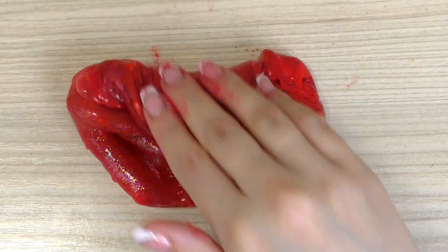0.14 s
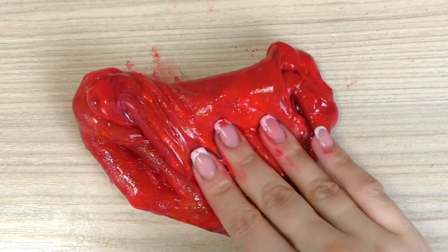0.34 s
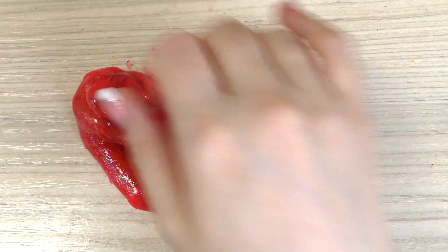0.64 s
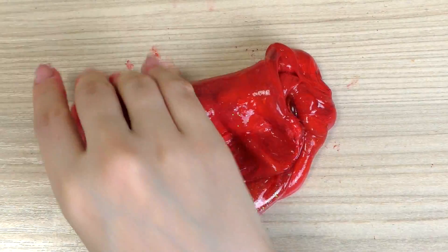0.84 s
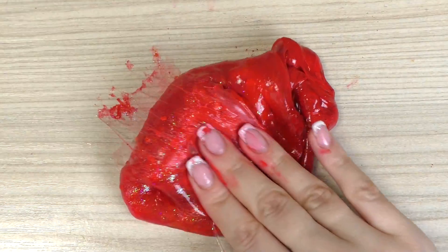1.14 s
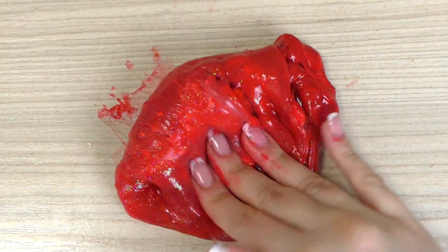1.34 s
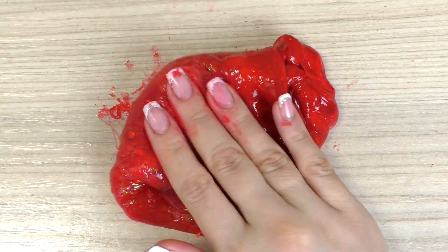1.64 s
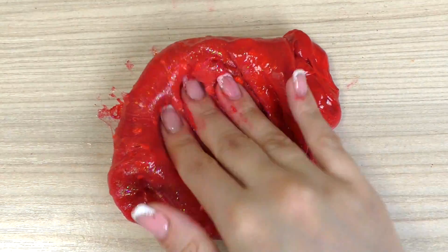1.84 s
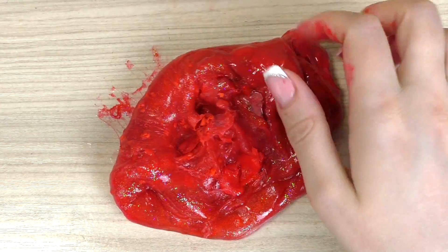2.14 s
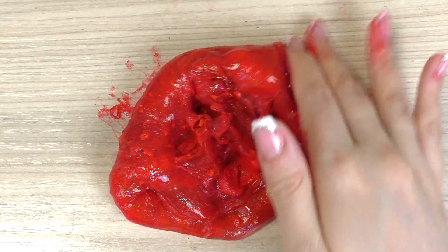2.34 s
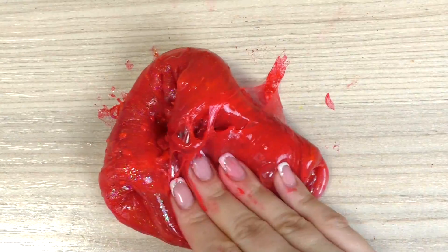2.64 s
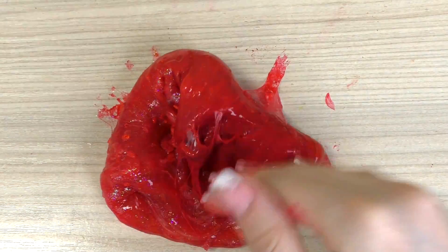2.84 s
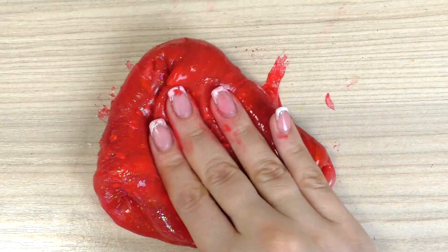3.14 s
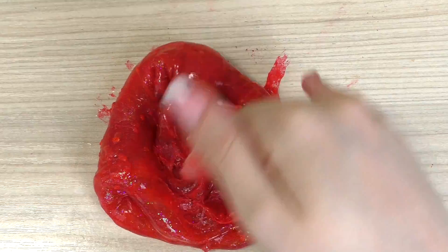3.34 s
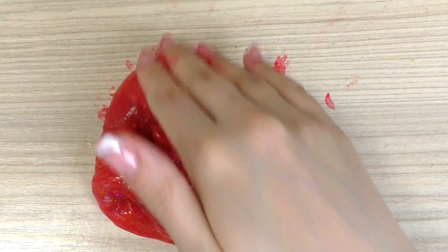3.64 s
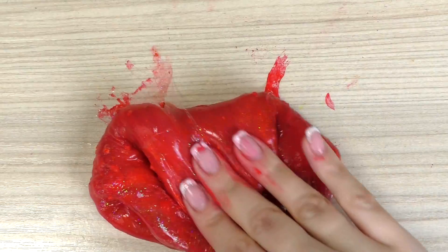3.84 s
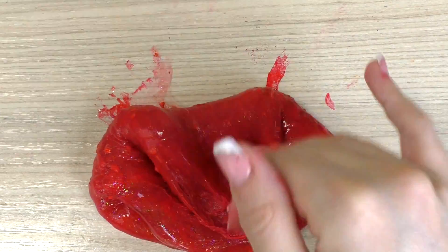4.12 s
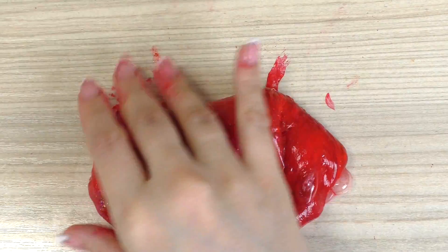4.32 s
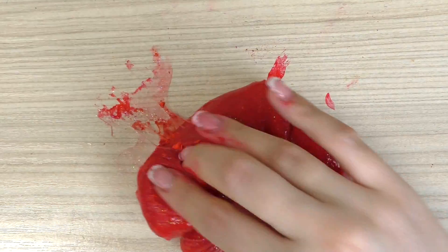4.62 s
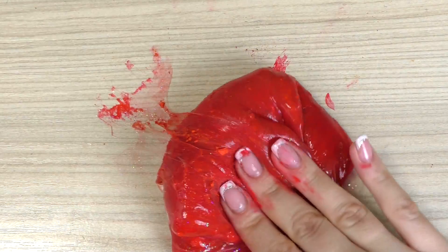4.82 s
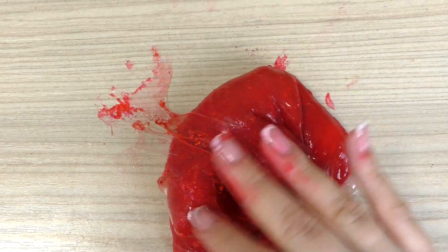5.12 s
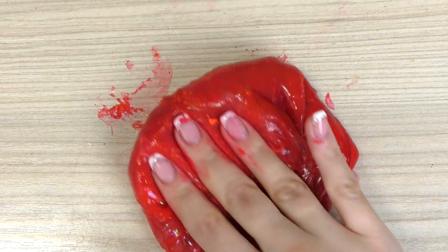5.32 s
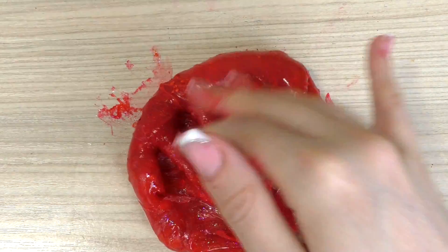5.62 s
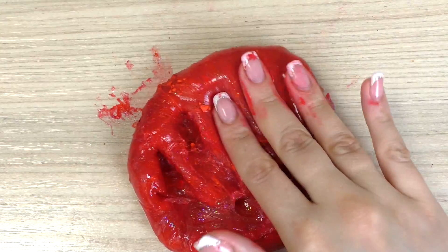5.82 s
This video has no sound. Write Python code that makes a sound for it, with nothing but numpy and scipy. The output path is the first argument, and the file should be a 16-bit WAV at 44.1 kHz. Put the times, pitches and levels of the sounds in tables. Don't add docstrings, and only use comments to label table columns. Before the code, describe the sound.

Close-up slime kneading: sparse crisp bubble snaps, moist crackling peels and soft dull thuds in a small hard room.

```python
import sys
import numpy as np
from scipy import signal
from scipy.fft import rfft, irfft
from scipy.io import wavfile
from scipy.ndimage import uniform_filter1d

SR = 44100
rng = np.random.default_rng(int(sys.argv[2]) if len(sys.argv) > 2 else 0)


def makeup_ratio(level_db):
    decades = np.asarray(level_db, float) / 20
    return 10 ** decades


def wrap_up_sound(samples):
    columns = np.atleast_2d(samples).T
    tamed = np.clip(columns, -1, 1)
    steps = np.round(tamed * 32767).astype(np.int16)
    wavfile.write(sys.argv[1], SR, steps)


N = 263277
LEFT_RIGHT = np.array([[1], [-1]])


def rms_one(x):
    return x / np.sqrt(np.mean(x ** 2) + 1e-30)


def at_hz(points, hz, column=1):
    points = np.array(points)
    return np.interp(np.log(hz), np.log(points[:, 0]), points[:, column])


def band(x, low_hz, high_hz):
    sos = signal.butter(2, [low_hz, min(high_hz, .45 * SR)], "band", fs=SR, output="sos")
    return signal.sosfilt(sos, x)


def smooth_noise(shape, size):
    return rms_one(uniform_filter1d(rng.standard_normal(shape), size=size))


def ring(clicks, hz, t60_s):
    r = makeup_ratio(-60 / (t60_s * SR))
    w = 2 * np.pi * hz / SR
    return signal.lfilter([0, np.sin(w)], [1, -2 * r * np.cos(w), r * r], clicks + 1e-18)


def add(out, crest_s, peak_db, hz, rise_s, phase):
    t = np.arange(int(5 * rise_s * SR) + 2) / SR
    start = max(round((crest_s - rise_s) * SR), 0)
    swell = (t / rise_s * np.exp(1 - t / rise_s)) ** 3
    wave = makeup_ratio(peak_db) * swell * np.cos(2 * np.pi * hz * (t - rise_s) + phase)
    out[start:start + len(t)] += wave[:N - start]


# peak t/s, level/dB, f/Hz, Q
AIR_POCKETS = [(.1214, -48.5, 1300, 2.9), (.4578, -40, 1610, 5), (.2596, -37, 1370, 0.86),
               (.2658, -43, 1960, 3.3), (.385, -39, 1410, 6.8), (.389, -25.5, 1410, 10),
               (.441, -25, 1500, 6.5), (.4477, -9, 1600, 5), (.4515, -35, 1650, 2.1),
               (.974, -50, 1193, 4.8), (1.0579, -47.5, 2520, 7.8), (1.1572, -47, 1580, 5.1),
               (1.1738, -33, 1770, 2.7), (1.2511, -49, 1577, 3.3), (1.299, -51, 2180, 2.4),
               (1.3262, -33, 1712, 3), (1.7232, -50.5, 1484, 2.9), (2.0674, -48, 2446, 7.6),
               (2.356, -24.5, 2114, 1.45), (2.6685, -43, 2330, 1.6), (2.7468, -34, 1630, 4.3),
               (2.909, -56, 1390, 1.25), (3.155, -34.5, 2030, 0.8), (3.4031, -46, 1270, 2.9),
               (3.993, -42.5, 1950, 2), (4.471, -35.5, 2200, 5.4), (4.472, -40, 1410, 9.1),
               (4.9216, -37.5, 2270, 1.3), (5.1094, -45, 1815, 2.4), (5.6639, -42, 1373, 2),
               (.259, -46.5, 5330, 2.3), (.371, -44, 3800, 2.7), (.446, -22.5, 2840, 3.3),
                 (1.0581, -28.5, 4730, 1.4), (1.131, -39.5, 3860, 2), (1.1733, -32, 3600, 2.9),
                 (1.1725, -36, 7065, 8), (1.299, -38, 3760, 2.1), (1.3256, -10.5, 3950, 1.84),
                 (1.3256, -12, 6530, 4.9), (.4475, -30, 1094, 1.4), (1.5137, -44, 3440, 3),
                 (1.7463, -52, 3360, 3.7), (1.8422, -48.5, 1520, 2.4), (2.3585, -25.5, 4830, 1.45),
                 (2.542, -39, 6560, 1.3), (2.903, -39, 4400, 2.4), (2.912, -33.5, 5460, 1.9),
                 (3.155, -22.5, 4530, 2.2), (3.155, -11.5, 6910, 2.67), (3.399, -37, 6400, 3.5),
                 (4.0304, -45.5, 4470, 1.7), (4.8, -51, 3470, 2.8), (5.1, -31.5, 4300, 1.8),
                 (5.1094, -25, 3940, 2.03), (5.4599, -44, 6250, 4.6), (5.6468, -38, 5740, 1.8),
                 (5.66, -35, 4260, 2.4), (5.9684, -36, 5240, 1.2)]


def pockets():
    return AIR_POCKETS


# peak t/s, level/dB, f/Hz
FILMS = [(1.0046, -37, 11000), (1.1729, -27, 10440), (1.325, -20, 9810), (1.3257, -13, 14200),
         (1.3287, -32, 14000), (1.4208, -36.5, 12000), (1.6086, -42.5, 12500), (2.0215, -35, 12800),
         (2.0646, -32, 13000), (2.354, -34, 12200), (2.446, -39, 10200), (2.6881, -42, 10620),
         (2.7465, -16.5, 10600), (2.751, -34, 10060), (2.9012, -33, 10300), (3.1512, -28, 8000),
         (3.155, -30.5, 12500), (3.153, -30, 15400), (3.294, -40.5, 12640), (3.3992, -15.5, 10760),
         (4.1639, -29, 10060), (5.105, -34, 11070), (5.6469, -26, 13300), (5.66, -20, 10170),
         (5.6886, -43, 11750), (5.706, -33, 10800), (5.863, -29, 12660), (5.9684, -35, 12010)]


def films():
    film_q = 4.2
    return [(*film, film_q) for film in FILMS]


# middle slip t/s, level/dB, f/Hz, lean/dB (+ late slip stronger, - early)
TEARS = [(0.1484, -27, 4680, 5), (0.1501, -24, 8640, -1), (0.27, -40, 11300, -5), (0.2865, -37, 12700, -6),
         (.958, -31.5, 12800, -6), (1.011, -34, 7260, 3), (1.0086, -28, 9900, -11),
         (1.0596, -24.5, 8670, -11.5), (1.0615, -40, 6520, -1), (2.0233, -34.5, 6340, 0),
         (2.06, -30, 4040, 1), (2.066, -27.5, 3880, 1), (2.3566, -25, 3840, -6), (2.751, -31, 6930, -7),
         (2.8866, -36.5, 12000, 5), (2.9143, -31.5, 11340, -12), (3.8069, -46, 6250, -7),
         (3.8085, -35.5, 9800, -13), (4.1577, -39, 11700, -4.5), (4.4703, -34.5, 3500, 0.5),
         (4.594, -38, 10200, 10), (4.917, -44.5, 4460, 10), (4.9184, -31.5, 11300, 1),
         (5.1096, -23.5, 10750, -1.7), (5.4598, -25.5, 12000, 11), (5.663, -25, 4400, 0)]


def tears():
    gap_s, loss_db, detune, tear_q = .0021, 11.5, 0.028, 3
    slips = []
    for s, db, hz, lean_db in TEARS:
        for side in (-1, 0, 1):
            late, off = rng.uniform(-1, 1, 2)
            slip_s = s + side * gap_s * (1 + 0.28 * late)
            slip_db = db - abs(side) * loss_db + side * lean_db
            slips.append((slip_s, slip_db, hz * (1 + abs(side) * detune * off), tear_q))
    return slips


# peak t/s, level/dB
THREADS = [(.1229, -45), (.2394, -47), (.3222, -48), (0.406, -40), (0.582, -38), (1.2453, -42),
           (1.5007, -49), (1.5424, -39), (2.142, -46.5), (2.392, -48), (2.453, -42), (2.541, -36.5),
           (2.987, -39), (3.385, -36), (3.431, -39), (3.745, -48), (3.792, -47), (3.8386, -37),
           (2.657, -50), (2.635, -60), (3.93, -52.5), (4.0955, -46.5), (2.471, -53), (4.528, -55),
           (4.5517, -46), (4.657, -48), (4.7207, -46), (4.76, -45), (5.0941, -52), (5.419, -50.5)]


def threads():
    thread_hz, detune, thread_q = 10500, .08, 3.6
    offs = rng.uniform(-2.8, 1, len(THREADS))
    return [(s, db, thread_hz * (1 + detune * off), thread_q) for (s, db), off in zip(THREADS, offs)]


# peak t/s, level/dB, f/Hz, Q
MORE_BURSTS = [(.395, -45, 1360, 9.2), (.419, -38.5, 1420, 6.4), (.581, -40, 1650, 5), (1.795, -52, 2900, 3.3),
               (2.037, -40.5, 4000, 2.5), (2.075, -40, 3820, 8.2), (2.086, -45.5, 3700, 4), (2.205, -55, 9300, 4),
               (2.508, -49, 8800, 4), (2.571, -44, 11570, 4.1), (2.6688, -31, 9850, 7.9),
               (2.678, -38, 13500, 3.3), (4.186, -47, 10850, 5), (4.4702, -41, 9000, 1.1), (4.488, -46, 2040, 5),
               (4.498, -46, 2300, 3.4), (4.513, -48, 2800, 1.8), (4.528, -52, 2150, 5), (4.607, -40, 9400, 6),
               (4.619, -44, 4560, 3), (6.3, -45, 1700, 3.7), (4.813, -48, 7560, 3), (4.904, -55.5, 3704, 2),
               (4.951, -50.5, 3500, 4), (6.7, -49, 4700, 7.7), (5.681, -35.5, 4040, 4.5), (5.728, -55, 4600, 5)]


def more_bursts():
    return list(MORE_BURSTS)


def pops():
    air = np.zeros(N)
    for s, peak_db, hz, q in pockets() + films() + tears() + threads() + more_bursts():
        phase = rng.uniform(-.7, .7)
        add(air, s, peak_db - .4, hz, 0.45 * q / hz, phase)
        add(air, s, peak_db - 17.5, hz, 0.44 / hz, phase)
    return signal.sosfilt(signal.butter(3, 950, "high", fs=SR, output="sos"), air)


def crackle(level, per_s, low_hz, high_hz, cycles, spread_db):
    clumps = makeup_ratio(2.5 * smooth_noise(N, 250))
    sizes = clumps * makeup_ratio(spread_db * np.minimum(rng.exponential(1, N), 3)) * rng.choice([-1, 1], N)
    snaps = sizes * (rng.random(N) < per_s / SR)
    dealt = rng.integers(0, 14, N)
    grains = np.zeros(N)
    for k, hz in enumerate(np.geomspace(low_hz, high_hz, 14)):
        grains += ring(snaps * (dealt == k), hz, cycles / hz)
    return level * rms_one(band(grains, 1.15 * low_hz, 1.1 * high_hz))


# crest t/s, length/s, fine crackle level/dB, coarse squelch level/dB
PULLS = [(.123, 0.09, -72, -63), (.238, 0.023, -65, -70), (.615, 0.12, -61.5, -57),
         (.976, 0.045, -71, -61.5), (1.006, 0.059, -55, -60.5), (1.51, 0.11, -62.5, -64),
         (1.79, 0.13, -86.5, -68.5), (2.012, 0.075, -67, -62), (2.473, 0.088, -67.5, -63),
         (2.922, 0.064, -58.5, -52.5), (3.396, 0.12, -64.5, -61.5), (3.425, 0.082, -58, -55),
         (3.985, 0.18, -92, -76), (4.174, 0.089, -62.5, -60.5), (4.57, 0.096, -72, -77),
         (4.602, 0.044, -56, -65), (4.662, 0.033, -60.5, -66), (5.06, 0.48, -75.5, -68),
         (5.12, 0.084, -55.5, -53), (5.965, 0.079, -74, -66)]
# crest t/s, length/s, fine crackle level/dB, coarse squelch level/dB
SETTLES = [(.15, 0.083, -67, -62), (.29, 0.22, -73, -69), (.415, 0.2, -76, -63), (1.06, 0.055, -72, -74),
           (1.136, 0.17, -81, -65), (1.265, 0.41, -70.5, -63.5), (2.043, .17, -65, -63),
           (2.368, 0.13, -71, -56.5), (2.52, 0.2, -68, -61.5), (2.69, 0.54, -70.5, -67.5),
           (2.748, 0.042, -51, -53.5), (3.765, 0.39, -71.5, -71.5), (3.81, 0.14, -77, -72),
           (4.482, 0.088, -74.5, -57.5), (4.655, 0.33, -71, -73.5), (4.81, 0.26, -82, -67),
           (5.63, 0.17, -67.5, -65.5), (5.67, 0.096, -60, -63.5)]


def peeling():
    t = np.arange(N) / SR
    fine, coarse = np.zeros((2, N))
    for moves, rise in (PULLS, 0.54), (SETTLES, 0.11):
        for crest_s, length_s, fine_db, coarse_db in moves:
            knots_s = [-rise * length_s, 0, (1 - rise) * length_s]
            swell = np.sin(np.interp(t - crest_s, knots_s, [0, np.pi / 2, np.pi])) ** 2
            fine += makeup_ratio(fine_db + 2.5) * swell
            coarse += makeup_ratio(coarse_db - 1.5) * swell
    top = crackle(fine, 9000, 6500, 15500, cycles=8, spread_db=3)
    middle = crackle(coarse, 4000, 1150, 6500, cycles=8, spread_db=3.3)
    rumble = crackle(coarse * makeup_ratio(-7.0), 700, 110, 570, cycles=4.5, spread_db=0.5)
    return top + middle + rumble


# start t/s, length/s, level/dB rms, first f/Hz, last f/Hz
SQUEEZES = [
    (1.245, 0.053, -63.5, 1250, 1140),
    (2.01, .09, -60.5, 4800, 3596),
    (2.495, .05, -71, 1200, 1140),
    (2.55, 0.045, -60.5, 6500, 6100),
    (3.41, .08, -69, 1170, 1240),
    (4.14, .05, -67, 1106, 1120),
    (4.56, .06, -75, 11000, 8400),
    (4.8, .05, -74, 4950, 7630),
    (5.59, .06, -65, 4740, 7560),
]


def squeezes():
    slit_q = 4.5
    out = np.zeros(N)
    for s, length_s, db, first_hz, last_hz in SQUEEZES:
        u = np.linspace(0, 1, int(length_s * SR))
        flutter = smooth_noise((2, SR // 4), int(SR * slit_q / first_hz / 2))[:, :len(u)]
        phase = 2 * np.pi * np.cumsum(first_hz + (last_hz - first_hz) * u) / SR
        breath = flutter[0] * np.cos(phase) + flutter[1] * np.sin(phase)
        start = int(s * SR)
        out[start:start + len(u)] += makeup_ratio(db) * np.sin(np.pi * u ** .7) * breath
    return out


# f/Hz, level/dB, t60/s
TABLE_MODES = [(406.7, -48.5, 0.06), (1120, -37.5, .04), (1250, -40.5, 0.032)]


def table_top(x):
    return x + sum(makeup_ratio(db) * ring(x, hz, t60_s) for hz, db, t60_s in TABLE_MODES)


# t/s, level/dB, f/Hz, t60/s
THUDS = [(0.042, -54, 133, 0.1), (0.446, -43, 406, 0.034), (1.268, -59.5, 350, 0.13),
         (1.325, -50.5, 406, 0.04), (1.79, -56, 301, 0.065), (2.35, -52.5, 109, 0.083),
         (2.358, -51, 1130, 0.035), (2.749, -47.5, 1160, 0.025), (3.398, -48, 1200, 0.03),
         (4.157, -58, 1116, 0.038), (3.41, -52, 443, 0.05), (3.429, -58, 400, .04),
         (3.428, -53, 119, 0.1014), (4.179, -54, 109, 0.078), (5.104, -70, 392, .08),
         (5.146, -47.5, 98.5, 0.082), (5.661, -48.5, 391, 0.089), (5.668, -58, 123, 0.15)]


def thuds():
    out = np.zeros(N)
    for s, peak_db, hz, t60_s in THUDS:
        add(out, s + t60_s / 6, peak_db + 1.5, hz, t60_s / 6, 0)
        add(out, s + t60_s / 2.2, peak_db - 9, hz * 1.07, t60_s / 4, 0)
    return out * (1 + 0.37 * smooth_noise(N, 300))


# delay t/s, level/dB
ECHOES = [(.0009, -21), (.0022, -15), (.0036, -13), (.0052, -15), (.0064, -19), (.008, -18), (0.0105, -19),
          (0.015, -26)]
# f/Hz, level/dB, t60/s
ROOM_TAIL = [(475, -12, 0.36), (1200, -26, 0.47), (1650, -28.5, 0.5), (2300, -22.5, 0.33),
             (3500, -18, 0.24), (6930, -20, 0.32), (12000, -19, 0.18)]


def room(x):
    t = np.arange(SR // 2) / SR
    lumps = makeup_ratio(2.42 * rng.standard_normal(len(t)))
    mid, side = rng.standard_normal((2, 2, 1, len(t))) * lumps
    white = mid + 0.43 * side * LEFT_RIGHT
    edges_hz = 350 * 2 ** np.arange(0, 6, .5)
    tail = 0
    for k, (low_hz, high_hz) in enumerate(zip(edges_hz, edges_hz[1:])):
        hz = np.sqrt(low_hz * high_hz)
        decay_db = at_hz(ROOM_TAIL, hz) - 15.5 - 60 * t / at_hz(ROOM_TAIL, hz, column=2)
        tail = tail + band(white[k % 2], low_hz, high_hz) * makeup_ratio(decay_db)
    tail = tail * np.clip(t / 0.003, 0, 1) ** 2
    tail[:, 0] += 1
    for s, echo_db in ECHOES:
        smear = np.exp(-np.clip(t - s, 0, 1) / 0.00054) * (t >= s)
        tail += makeup_ratio(echo_db - 9.5) * smear * white[0]
        tail[:, round(s * SR)] += makeup_ratio(echo_db - 10.5)
    return signal.fftconvolve(x[None], tail, axes=1)[:, :N]


# t/s, level/dB rms
HUM = [(0.0, -59.5), (0.55, -68.5), (0.61, -59), (0.73, -72.5), (1.11, -62), (1.26, -77.5), (2.08, -68.5),
       (2.18, -55), (2.28, -76), (3.139, -65), (3.37, -71.5), (5.97, -63)]


def hum():
    hum_hz = 154
    s, level_db = np.transpose(HUM)
    t = np.arange(N) / SR
    shared, left, right = smooth_noise((3, N), 2500)
    phase = 2 * np.pi * hum_hz * t + 0.81 * shared + 0.25 * np.array([left, right])
    return np.sqrt(2) * makeup_ratio(np.interp(t, s, level_db) - 2.0) * np.sin(phase)


# f/Hz, level/dB per Hz
FLOOR = [(15, -13), (25, -11), (76, -8), (156, -2), (200, -8), (389, -9), (584, -22), (766, -16),
         (1470, -14.5), (2700, -18), (4000, -24.5), (6210, -36.5), (10000, -29), (16000, -24)]
# f/Hz, likeness/1
LIKENESS = [(30, .3), (130, 0.67), (290, 0.57), (640, 0.13), (1410, 0.59), (3100, 0.46), (6820, 0.88),
            (15000, 0.26)]


def background():
    floor_db = -63
    hz = np.maximum(np.arange(N // 2 + 1) * SR / N, 10)
    mid, side = rfft(rng.standard_normal((2, N))) * makeup_ratio(at_hz(FLOOR, hz))
    alike = np.clip(at_hz(LIKENESS, hz), 0, 1)
    both = np.sqrt(1 + alike) * mid + np.sqrt(1 - alike) * side * LEFT_RIGHT
    return makeup_ratio(floor_db) * rms_one(irfft(both, N))


def scene():
    slime = room(table_top(pops() + peeling() + squeezes()))
    treble = band(np.roll(slime.mean(axis=0), 1), 8000, SR / 2)
    treble_side = makeup_ratio(-23) * treble * LEFT_RIGHT
    return slime + treble_side + thuds() + hum() + background()


def roll_off(x):
    return signal.sosfilt(signal.butter(12, 17160, fs=SR, output="sos"), x)


def low_pass(x, stop_hz):
    return signal.sosfiltfilt(signal.cheby2(10, 40, stop_hz, fs=SR, output="sos"), x)


def record(dry):
    steady = low_pass(dry, 16200)
    full = low_pass(dry, 16750)
    treble_power = np.diff(steady, 2, prepend=0, append=0).mean(axis=0) ** 2
    usual = uniform_filter1d(treble_power, size=900, origin=449)
    sudden = uniform_filter1d(treble_power, size=40) > 90 * usual
    keep = np.clip(30 * uniform_filter1d(1. * sudden, size=300), 0, 1)
    mix = steady + (full - steady) * keep
    return roll_off(mix)


dry = scene()
out = record(dry)
wrap_up_sound(out)
```